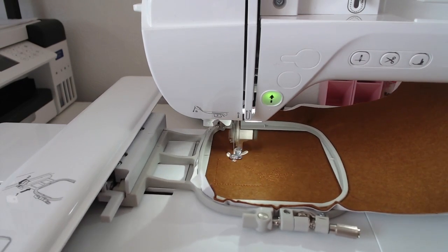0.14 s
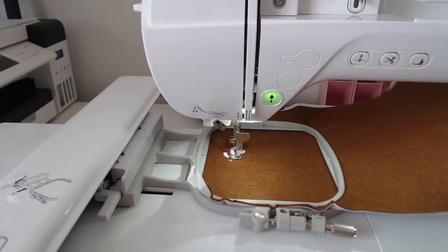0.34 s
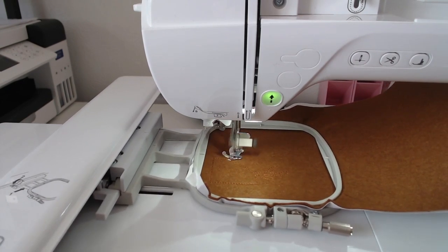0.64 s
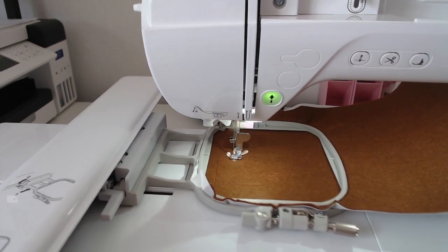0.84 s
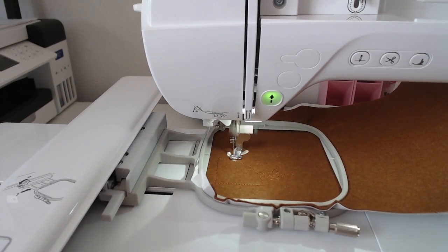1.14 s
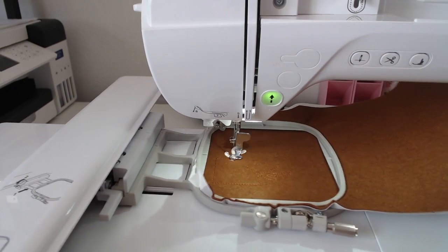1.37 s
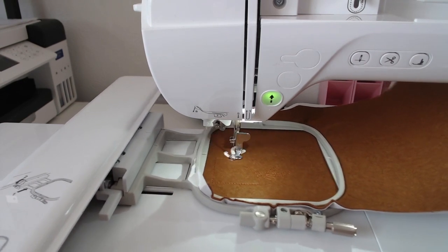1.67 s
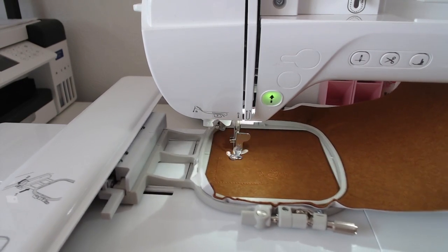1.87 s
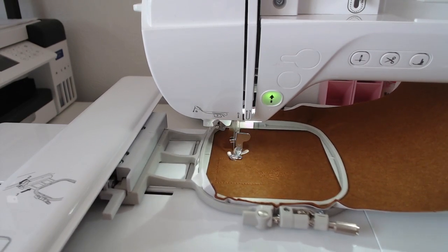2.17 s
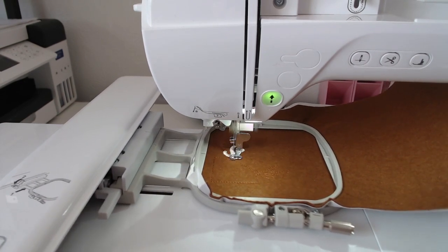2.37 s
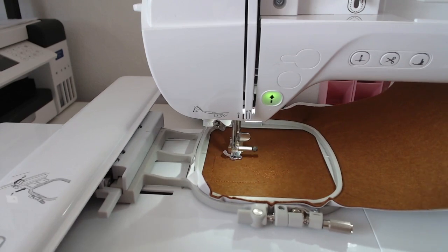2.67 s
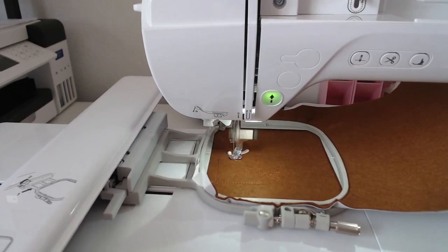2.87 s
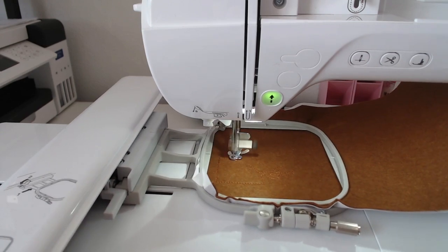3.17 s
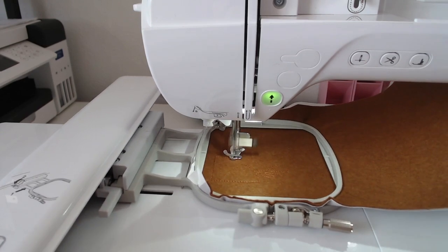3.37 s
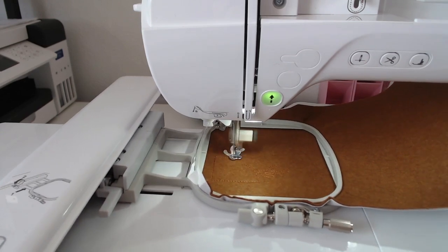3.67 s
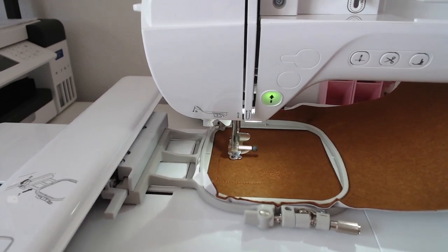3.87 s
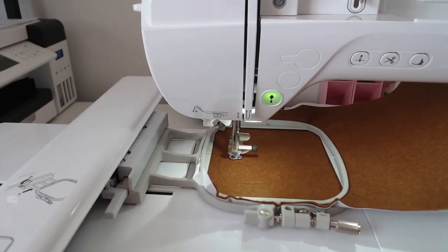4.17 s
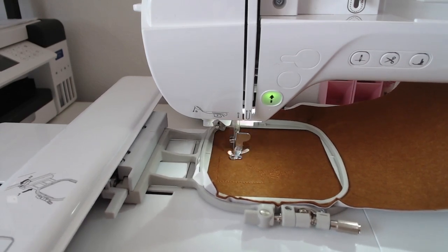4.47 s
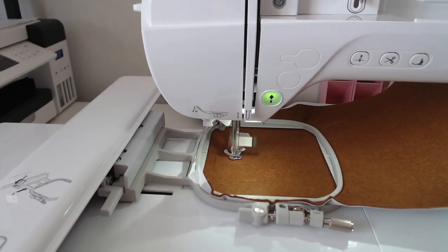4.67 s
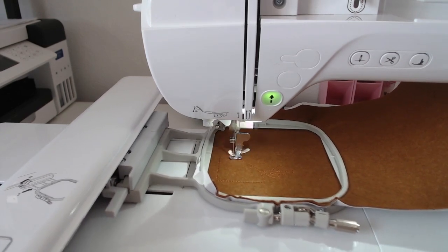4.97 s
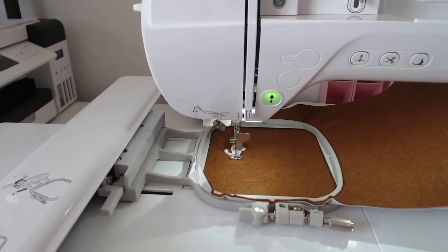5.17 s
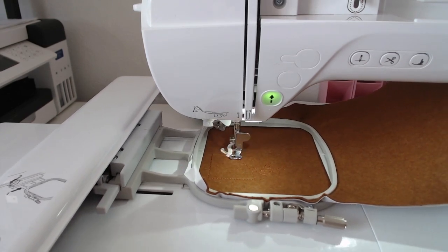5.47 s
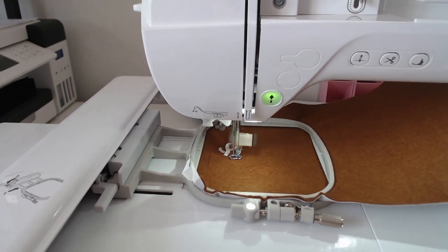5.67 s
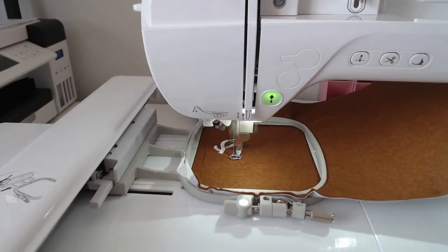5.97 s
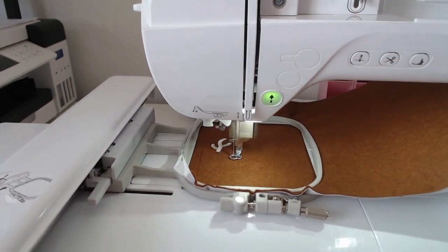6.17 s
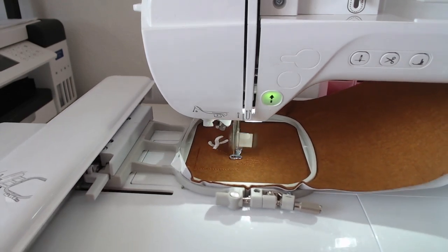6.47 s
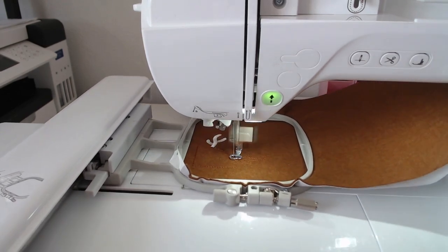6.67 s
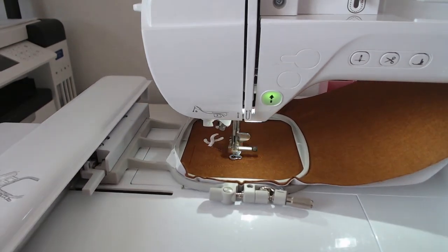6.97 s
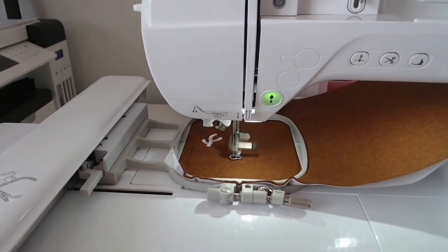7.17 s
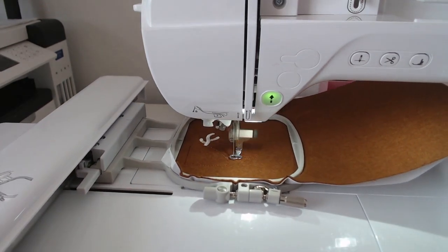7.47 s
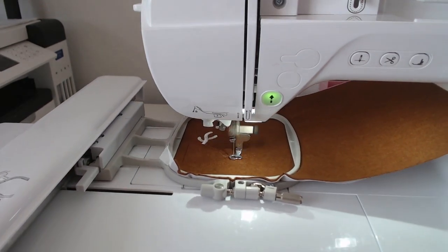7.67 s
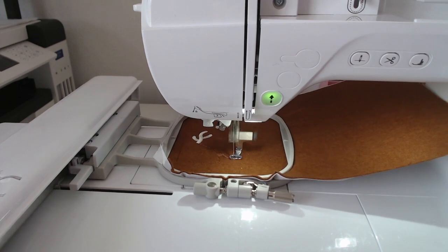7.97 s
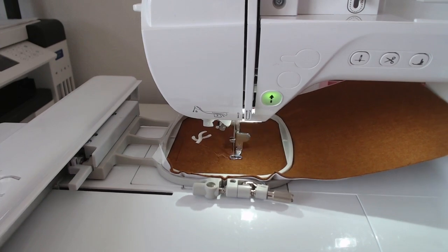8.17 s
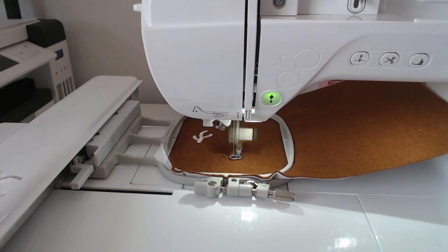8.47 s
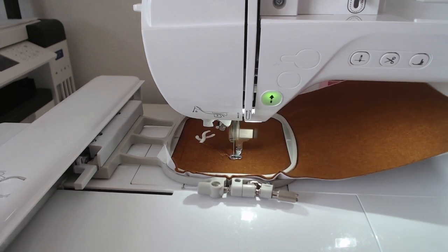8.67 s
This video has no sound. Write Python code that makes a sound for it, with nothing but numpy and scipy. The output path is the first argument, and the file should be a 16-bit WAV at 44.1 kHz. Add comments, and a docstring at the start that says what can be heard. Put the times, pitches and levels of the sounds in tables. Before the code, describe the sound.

An embroidery machine sews close by in a small room. Even needle knocks, nearly six a second, alternate with metallic ticks and the raspy jerks of motors moving the hoop. Just after five seconds the pace climbs to about ten strokes a second, a gear whine and hollow case drone swell, and it ends faster still, without stopping.

```python
"""First one hears a slow, steady knocking and rattling: an embroidery machine sews in a small room.
After five seconds it speeds up to nearly twice the pace. In every turn of the main shaft the needle knocks
down, the links tick, and stepper motors jerk the hoop along. Blows are short bursts of noise and fading
sines; rumble, rattle and drone are coloured noise. The gear whine is a tone that follows the sewing speed."""
import sys
import numpy as np
from scipy import signal
from scipy.fft import rfft, irfft, next_fast_len
from scipy.io import wavfile
from scipy.ndimage import uniform_filter1d

SR = 44100
rng = np.random.default_rng(int(sys.argv[2]) if len(sys.argv) > 2 else 0)


def digitize_waveform(pressure):
    """Quantize a signal to 16-bit integers and store it at the path in sys.argv[1].

    Rows of a 2-D input are taken as channels; values are limited to [-1, 1].
    """
    field = np.atleast_2d(pressure).T
    bounded = np.clip(field, -1, 1)
    quanta = np.round(bounded * 32767).astype(np.int16)
    wavfile.write(sys.argv[1], SR, quanta)


N = 389844
TIME = np.arange(N) / SR
PADDED = next_fast_len(N + SR // 2, True)
BINS = np.fft.rfftfreq(PADDED, 1 / SR)

# A turn starts at the needle stroke; a share of a turn runs from 0 to 1. Source levels are before room and balance.
# sewing speed: (time [s], speed [stitches/s])
SEWING_SPEED = [(0, 5.812), (4.98, 5.82), (5.2, 6.5), (5.6, 8.17), (5.78, 9), (5.93, 9.35), (5.98, 9.95),
                (6.16, 10.3), (6.32, 10), (6.74, 9.97), (6.8, 9.27), (7.1, 9.1), (7.37, 9.25), (7.48, 9.96),
                (7.82, 10), (8.14, 11.37), (8.3, 11.53), (8.84, 11.52)]
# needle strokes: (time [s], metal click [dB], woody knock [dB], low thump [dB], size of the hoop move before it [dB])
STITCH_LEVELS = [(0.1513, -49, -57, -47, 1.5), (0.322, -58, -41.5, -33.5, -3.5), (0.4965, -46, -55, -40, 1),
                 (0.6674, -61.5, -46, -45, -2.5), (0.841, -54, -53, -36, -1.5),
                 (1.0102, -63.5, -46, -41, -5), (1.1825, -51, -52, -38, -4),
                 (1.3551, -56.5, -44, -46, -0.5), (1.527, -52, -46, -45, -5.5),
                 (1.701, -50.5, -41.5, -35, -4), (1.8728, -51, -44, -37, -4.5), (2.0425, -52, -61, -46, -4),
                 (2.2162, -59, -60.5, -43, -4), (2.386, -53, -50.5, -45, -4), (2.56, -49, -41, -51, -2.5),
                 (2.7294, -49.5, -43.5, -39, -5), (2.9041, -62.5, -65, -40.5, -3),
                 (3.074, -50, -44, -45, -6.5), (3.2465, -46, -48, -45, -3), (3.42, -51, -44, -41, -3),
                 (3.5909, -49, -46.5, -61, -3), (3.762, -49, -38.5, -39, -2.5),
                 (3.9335, -46, -47.5, -42, -2.5), (4.1043, -58.5, -42, -41.5, -6),
                 (4.2771, -50, -41.5, -49, -2), (4.45, -49.5, -39, -40, -4.5),
                 (4.6215, -59.5, -51, -64, -1.5), (4.7921, -52.5, -41.5, -42.5, -2),
                 (4.96, -51.5, -54, -51, -2.5), (5.1303, -61, -49, -67, -18), (5.2831, -45, -43, -38, 0.5),
                 (5.4219, -49, -47, -43, -2), (5.5509, -46, -42.5, -43, -2), (5.671, -48.5, -52, -59, -2),
                 (5.7849, -48, -39.5, -34, -0.5), (5.894, -51.5, -52, -38, 1), (6.0006, -49, -41, -36, 0),
                 (6.1005, -48.5, -43, -44, -4.5), (6.196, -53.5, -41.5, -33, -2),
                 (6.295, -52.5, -37, -34.5, -5), (6.395, -50.5, -40, -38, -8),
                 (6.4931, -51, -44, -42.0, -4.5), (6.5975, -57.5, -39, -53, 1), (6.6964, -48, -47, -47, -3),
                 (6.797, -60.5, -49, -49, -4), (6.91, -49.5, -46.0, -63, 0.5),
                 (7.0177, -49.5, -37.5, -36, 2), (7.1314, -61, -45.5, -56, -14), (7.2369, -54, -42, -52, 0),
                 (7.346, -54, -46, -38, 0.5), (7.4495, -53.5, -45, -51, -4), (7.5508, -55, -40, -42, -7),
                 (7.652, -52.5, -37.5, -63, -4.5), (7.752, -47, -43, -67, -2.5),
                 (7.8516, -46, -40, -44, -3.5), (7.9486, -51, -47, -39, -4), (8.0419, -55, -39, -35.5, -8),
                 (8.1294, -64, -56, -46, -12), (8.2157, -56.5, -48, -40, -1.5),
                 (8.3039, -58.5, -51, -45, 0), (8.3887, -51, -62, -42, -13), (8.4751, -51.5, -52, -35, 2),
                 (8.5615, -50, -55, -44, -9.5), (8.6484, -47.5, -38, -49, 1), (8.7327, -56.5, -56, -36, 0),
                 (8.819, -54, -56, -51.0, -6)]
# ticks of the links in each turn: (share of turn [0-1], level against the mean needle click [dB])
LINK_TICKS = [(0.228, -4.5), (0.675, -5), (0.813, -3), (0.963, -11.5)]
# jerks of the hoop in each move: (share of turn [0-1], level against the shake [dB], thud pitch [Hz])
HOOP_JERKS = [(0.531, 5, 174), (0.639, 7.5, 183), (0.695, 0, 228.4), (0.743, -4, 199), (0.794, 1, 150.7),
              (.857, 8, 152)]
# swing of levels over one turn: (share of turn [0-1], stepper activity [dB], load on the bearings [dB])
TURN_LOAD = [(0, -3, 5.5), (.12, -9.5, 4.5), (.3, -14, -0.5), (.49, -29.5, 1.5), (.505, 6, 0.5), (.6, 6, 5),
             (.68, 8, 4), (.77, 7.5, 5), (.84, -0.5, 8), (.92, -5, 3), (1, 6.5, 5.5)]
# clacks of the hoop in its mount during some moves: (time [s], level before trims [dB], ring pitch [Hz])
HOOP_CLACKS = [(0.266, -44.5, 2520), (0.445, -49, 2580), (0.608, -46.5, 2880), (3.37, -47, 4000),
               (3.7084, -50, 3900), (3.8737, -48, 3240), (4.221, -45, 3170), (4.5655, -46, 2400),
               (4.604, -52, 3950), (6.581, -55, 3000), (7.297, -49.5, 3220), (7.3207, -46, 2520),
               (8.088, -46.5, 2460), (8.2645, -55, 1900), (8.2935, -49.5, 3170)]
# knocks of the hoop's plastic frame: (time [s], level [dB], pitch [Hz])
FRAME_KNOCKS = [(0.369, -32, 603), (0.615, -40, 302), (0.713, -32, 450), (1.156, -35, 800),
                (1.501, -32.5, 700), (3.778, -31, 700), (6.437, -28.5, 380), (6.63, -28, 397),
                (7.239, -45, 350), (7.852, -25.5, 353), (8.093, -32, 700), (8.269, -31.5, 1050)]
# moves that make the carriage boom: (time of the peak [s], length [s], level at the peak [dB rms], pitch [Hz])
CARRIAGE_BOOMS = [(5.249, 0.045, -39, 217), (6.79, 0.047, -34, 216.5), (8.212, 0.02, -31, 220),
                  (8.313, 0.046, -37, 219)]
# ringing of the housing, carriage, needle plate and needle bar: (pitch [Hz], relative level [dB], time to fade 60 dB [s])
HOUSING_MODES = [(44.7, -15, 0.32), (94.4, -7.5, 0.9), (121, -5.5, 0.17), (141.5, 3.5, 0.32)]
CARRIAGE_MODES = [(104, -6, 0.15), (140, 1.5, 0.19), (215, -3, 0.091)]
PLATE_MODES = [(312, -2.5, 0.15), (338, 4, 0.093), (409.7, -1.5, 0.27), (452, -3, .06), (526, -4.5, 0.082),
               (642.2, -8.5, 0.35), (849, -5, 0.086)]
NEEDLE_BAR_MODES = [(1140, 1, 0.054), (3116, -4.5, 0.078), (4410, -15.5, 0.023)]
# noise colours, later scaled to an even overall level: (frequency [Hz], relative level [dB per Hz])
CLICK_COLOUR = [(200, -6.5), (1200, 6), (1900, 3.5), (3500, 5.5), (5000, 1.5), (6300, -2.5), (7400, -16.5),
                (8600, -30)]
LINK_COLOUR = [(200, -6.5), (1200, 0.5), (1900, 0), (2600, 5), (3900, 4), (4800, -0.5), (7200, -6),
               (8600, -38.5)]
STEPPER_COLOUR = [(100, -17), (300, 2.5), (800, 11.5), (1100, 6.5), (1350, 5.5), (1800, 1.5), (2500, 4.5),
                  (3200, -9), (4100, -7.5), (7300, -16), (8600, -42.5)]
BEARING_COLOUR = [(20, -16.5), (65, -24.5), (95, -6), (130, -1), (180, -13.5), (400, -12), (470, -15.5),
                  (800, -21.5), (1800, -33.5), (8600, -66)]
CHATTER_COLOUR = [(100, -14.5), (500, -0.5), (1200, 4), (4800, -4.5), (7400, -16.5), (8600, -40.5)]
# stepper scrape as the motors speed up and brake: (share of turn [0-1], pitch [Hz])
SCRAPE_PITCH = [(.49, 2209), (.6, 2410), (.66, 3306), (.69, 4020), (.76, 3296), (.84, 2457)]
# loudness of the gear and rotor tones by pitch: (frequency [Hz], level before the swings [dB])
GEAR_RESPONSE = [(765, -53.5), (845, -54.5), (920, -65), (1070, -62.5), (1255, -62.5), (1310, -54),
                 (1400, -60.5), (1475, -49), (1520, -59)]
ROTOR_RESPONSE = [(1400, -57), (1475, -64.5), (1650, -73.5), (2900, -69)]
# slow change of the gear tone: (time [s], level change [dB])
GEAR_DRIFT = [(0, 1), (2.5, 1), (3.3, -2), (3.8, -7), (4.9, -11.5), (5.15, 1), (8.2, 4.5), (8.84, 3.5)]
# swell of the gear tone in each turn, in full only at speed: (share of turn [0-1], level change [dB])
WHINE_THROB = [(0, -4.5), (.1, -1), (.3, 1.5), (.5, 0.5), (.8, -5.5), (1, -4.5)]
# hollow drones of the case: (pitch [Hz], width [Hz], level when slow [dB], level at full speed [dB]), before the swell
CASE_DRONES = [(220.6, 24, -58, -45), (345.3, 33, -63.5, -48.5), (404.8, 24, -61.5, -47),
               (533.4, 81, -66, -52.5), (783.3, 85, -58.5, -52.5), (1042, 58, -74.5, -59)]
# hum of the energised motors: (pitch [Hz], level before flutter [dB rms])
MOTOR_HUM = [(120, -50.5), (412, -65)]
# room sound against direct sound: (frequency [Hz], level [dB])
ROOM_COLOUR = [(60, -28), (150, -28.5), (350, -23.5), (700, -5.5), (1400, -4.5), (3000, -7), (8000, -5.5)]
# left against right: (frequency [Hz], left minus right [dB])
BALANCE = [(100, .5), (400, 0), (800, 1.2), (1400, 3), (2800, 1.4), (5500, 0)]
# how alike left and right are: (frequency [Hz], correlation [-1 to 1])
LIKENESS = [(150, .99), (400, 0.92), (750, 1), (1400, 0.57), (3000, 0.33), (7000, 0.25)]

SLOW, FAST = 5.82, 11.5  # stitches per second where haste is 0 and 1
TEETH, ROTOR_ORDER = 131, 253.4  # cycles per stitch of the gear tone and the rotor tone
# stepper rattle and hoop shake for a plain move; moves below SMALL_MOVE_DB shake less and less
RATTLE_DB, SHAKE_DB, SMALL_MOVE_DB = -55, -38, -4.5
# loose parts: blows a second at full speed, energy of a blow (steady chatter = 1), fall of that energy
LOOSE_PER_S, LOOSE_ENERGY, LOOSE_DECAY_S = 55, 10 ** (18 / 20), .003
# noise beside the clean gear tone, extra noise at full speed (both as gains)
MESH_ROUGH, MESH_ROUGH_FAST = .4, .2
GRAIN_DB = 2  # unevenness of the stepper sound
EDGE_HZ = 8700  # upper band limit


def amp(db):
    """Turns decibels into a gain."""
    return 10 ** (np.asarray(db) / 20)


def unit(x):
    """Scales to rms 1."""
    return x / np.sqrt(np.mean(x ** 2) + 1e-20)


def curve(rows, at, axis=1):
    """Joins one column of a table by straight lines."""
    rows = np.asarray(rows, float)
    return np.interp(at, rows[:, 0], rows[:, axis])


def spectrum(rows, hz):
    """Gain from a dB table, joined on a log-frequency axis."""
    f, db = np.transpose(rows)
    return amp(np.interp(np.log(hz + 1), np.log(f), db))


def colour(x, rows):
    """Filters by a spectrum, without delay."""
    return irfft(rfft(x, PADDED) * spectrum(rows, BINS), PADDED)[..., :N]


def waver(hz, order=12):
    """Random wandering of rms 1, mostly below hz; drawn at every order-th sample and joined by lines."""
    size = next_fast_len(N // order + 2, True)
    smooth = np.exp(-(np.fft.rfftfreq(size, order / SR) / hz) ** 2)
    slow = irfft(rfft(rng.standard_normal(size)) * smooth, size)
    return np.interp(TIME, np.arange(size) * order / SR, unit(slow))


def murmur(angle, width_hz):
    """A narrow band of noise of rms 1 around a turning phase."""
    return waver(width_hz) * np.sin(angle) + waver(width_hz) * np.cos(angle)


def spread(rows, envelope=1):
    """Coloured stereo noise from all over the machine, as alike left and right as LIKENESS says."""
    shared, apart = (rfft(envelope * rng.standard_normal(N), PADDED) for _ in range(2))
    alike = np.clip(curve(LIKENESS, BINS), -1, 1)
    mid = shared * np.sqrt((1 + alike) / 2)
    side = apart * np.sqrt((1 - alike) / 2)
    return irfft(np.array([mid + side, mid - side]) * unit(spectrum(rows, BINS)), PADDED)[:, :N]


def strike(times, db, response):
    """Blows at the given times, each setting off the response."""
    out = np.zeros(N)
    for at, gain in zip(np.round(times * SR).astype(int), amp(db)):
        if 0 <= at < N:
            out[at:at + len(response)] += gain * response[:N - at]
    return out


def ring(times, db, modes, uneven_db, window):
    """Blows into ringing modes, each in a slightly different mix; db is the nominal rms over window seconds."""
    t = np.arange(SR // 3) / SR
    rings = []
    for k, (hz, level, t60) in enumerate(modes):
        rings.append((-1) ** k * amp(level - 60 * t / t60) * np.sin(2 * np.pi * hz * t))
    size = np.sqrt(np.sum(np.sum(rings, 0) ** 2) / (window * SR))
    return sum(strike(times, db + uneven_db * rng.standard_normal(len(times)), r) for r in rings) / size


def tap(hz, rise):
    """A well-damped swing whose outline peaks at 1 after rise seconds."""
    t = np.arange(SR // 16) / SR
    return (t / rise * np.exp(1 - t / rise)) ** 2 * np.sin(2 * np.pi * hz * t)


def needle_times():
    """The moments at which the shaft completes a turn, with one turn more at each end."""
    s = np.array(STITCH_LEVELS)[:, 0]
    return np.r_[2 * s[0] - s[1], s, 2 * s[-1] - s[-2]]


def each_turn(share):
    """The moment at which the shaft passes an angle, in the turn that leads to each stitch."""
    s = needle_times()
    return (s[:-1] + share * np.diff(s))[:-1]


def haste_at(t):
    """About 0 when sewing slowly, about 1 at full speed."""
    return np.log(curve(SEWING_SPEED, t) / SLOW) / np.log(FAST / SLOW)


def stitches(shake_haste_db=-3.5):
    """Levels of every stitch in dB: needle click, plate knock, housing thump, stepper rattle, hoop shake."""
    s, click, knock, thump, move = np.transpose(STITCH_LEVELS)
    small_move_loss = 10 * np.log10(1 + amp(SMALL_MOVE_DB - move) ** 2)
    shake = SHAKE_DB + shake_haste_db * haste_at(s) - small_move_loss
    return click, knock, thump, RATTLE_DB + move, shake


def room(x, t60=0.17):
    """Adds a short room tail of fading noise, different at each microphone."""
    t = np.arange(SR // 3) / SR
    tails = rng.standard_normal((2, len(t))) * amp(-60 * t / t60)
    tails /= np.linalg.norm(tails, axis=1, keepdims=True)
    return x + colour(signal.fftconvolve(x, tails, axes=1)[:, :N], ROOM_COLOUR)


def hum(flutter=0.52, wander=0.84):
    """The energised motors hum throughout, at fixed pitches with a wavering level and phase (wander in radians)."""
    out = np.zeros(N)
    for hz, db in MOTOR_HUM:
        tone = np.sin(2 * np.pi * hz * TIME + wander * waver(5))
        out += np.sqrt(2) * amp(db) * (1 + flutter * waver(6)) * tone
    return out


def case(turn, haste, swell_db=8.0, swell_turns=0.11):
    """The plastic case drones at its resonances, most at speed and just after the needle stroke."""
    load_db = swell_db * uniform_filter1d(np.exp(-turn / swell_turns), SR // 200)
    out = np.zeros(N)
    for hz, width, slow_db, fast_db in CASE_DRONES:
        level = slow_db + (fast_db - slow_db) * haste + load_db
        out += murmur(2 * np.pi * hz * TIME, width) * amp(level)
    return out


def bearings(turn, haste, db=-50, haste_db=8, flutter_db=2.5, chatter_db=-68.0, chatter_haste_db=11.0):
    """Shaft and hook rumble with the load of the stroke; at speed loose parts chatter in separate little blows."""
    load_db = curve(TURN_LOAD, turn, axis=2) + flutter_db * waver(55)
    rumble = spread(BEARING_COLOUR) * amp(db + haste_db * haste + load_db)
    hits = rng.random(N) < LOOSE_PER_S * haste / SR
    blows = signal.lfilter([1], [1, -np.exp(-1 / (LOOSE_DECAY_S * SR))], hits)
    chatter = spread(CHATTER_COLOUR, unit(np.sqrt(1 + LOOSE_ENERGY * blows)))
    return rumble + chatter * amp(chatter_db + chatter_haste_db * haste + load_db)


def whine(turn, speed, haste, wobble=0.0065, slow_depth=0.017, port_lag=0.53):
    """Gear and rotor tones ride on the shaft speed and swell at case resonances; the gears throb each stitch."""
    angle = 2 * np.pi * np.cumsum(speed * (1 + wobble * waver(24.5))) / SR
    throb_db = curve(WHINE_THROB, turn) * (slow_depth + haste)
    teeth = TEETH * angle - np.array([[0], [port_lag]])  # radians; reaches the right microphone a little later
    mesh = np.sin(teeth) + (MESH_ROUGH + MESH_ROUGH_FAST * haste) * murmur(teeth, 70)
    mesh = mesh * spectrum(GEAR_RESPONSE, TEETH * speed) * amp(throb_db + curve(GEAR_DRIFT, TIME))
    rotor_level = spectrum(ROTOR_RESPONSE, ROTOR_ORDER * speed) * (1 + .5 * waver(73))
    rotor = rotor_level * np.sin(ROTOR_ORDER * angle + waver(57))
    return np.sqrt(2) * (mesh + rotor)


def booms():
    """The carriage swells and fades at its resonance."""
    out = np.zeros(N)
    for at, length, db, hz in CARRIAGE_BOOMS:
        swell = np.exp(-2 * ((TIME - at) / length) ** 2)
        out += np.sqrt(2) * amp(db) * swell * np.sin(2 * np.pi * hz * (TIME - at))
    return out


def frame(cycles=0.73, overtone=1.5, overtone_db=-6):
    """The plastic frame knocks hollowly; the lower the pitch, the longer the knock."""
    out = np.zeros(N)
    for at, db, hz in FRAME_KNOCKS:
        upper = amp(overtone_db) * tap(overtone * hz, cycles / hz / overtone)
        out += strike(np.array([at]), [db], tap(hz, cycles / hz) + upper)
    return out


def steppers(db, turn, haste, scrape_db=-9, scrape_haste_db=-6, scrape_width_hz=420, stray=0.064,
             step_count=40, step_decay=1.0):
    """The stepper motors rattle through each move, with a scrape that follows their pace and is weaker at speed."""
    level = np.interp(TIME, each_turn(0.76), db) + curve(TURN_LOAD, turn)
    steps = np.exp(-(step_count * turn % 1) / step_decay)  # decay in steps
    rattle = spread(STEPPER_COLOUR, unit(steps))
    angle = 2 * np.pi * np.cumsum(curve(SCRAPE_PITCH, turn) * (1 + stray * waver(30.09))) / SR
    scrape = np.array([murmur(angle, scrape_width_hz) for _ in range(2)])
    return amp(level + GRAIN_DB * waver(220)) * (rattle + amp(scrape_db + scrape_haste_db * haste) * scrape)


def hoop(shake, rise=0.0027, slop=0.00086, lag_share=0.0812, carriage_db=-13):
    """Each jerk is a short thud that leaves the carriage ringing; at speed jerks come later and less regularly."""
    s = needle_times()[1:-1]
    pace, out = haste_at(s), np.zeros(N)
    for share, db, hz in HOOP_JERKS:
        lag = lag_share * pace ** 2 / curve(SEWING_SPEED, s)
        times = each_turn(share) + lag + slop * pace * rng.standard_normal(len(s))
        out += strike(times, shake + db + rng.standard_normal(len(s)), tap(hz, rise))
        out += ring(times, shake + db + carriage_db, CARRIAGE_MODES, uneven_db=3.5, window=0.017)
    return out


def clicks(db, click_db=8, snap_s=0.0022, tick_db=1, clack_db=-1, tick_decay=0.015, clack_decay=0.0088,
           ring_db=-1, ring_decay=0.0041, tick_spread_db=2, slop=0.0015, tick_haste_db=-1):
    """Metal meets metal in noise bursts: the needle bar snaps and rattles, links tick, the hoop mount clacks."""
    s = needle_times()[1:-1]
    t = np.arange(SR // 10) / SR
    # the outlines here are energies, which add, hence twice the dB
    needle = strike(s, 2 * (db + click_db), np.exp(-(t / snap_s) ** 2))
    when, clack_level, _ = np.transpose(HOOP_CLACKS)
    links = strike(when, 2 * (clack_level + clack_db), np.exp(-2 * t / clack_decay))
    links += strike(s, 2 * (db + ring_db), np.exp(-2 * t / ring_decay))
    for share, link_db in LINK_TICKS:
        late, loud = rng.standard_normal((len(s), 2)).T
        level = db.mean() + link_db + tick_db + tick_haste_db * haste_at(s) + tick_spread_db * loud
        links += strike(each_turn(share) + slop * late, 2 * level, np.exp(-2 * t / tick_decay))
    return spread(CLICK_COLOUR, np.sqrt(abs(needle))) + spread(LINK_COLOUR, np.sqrt(abs(links)))


def metal(click_db, needle_db=3, detune=0.033, clack_db=4, clack_t60=0.041):
    """The needle bar rings briefly at a pitch that varies by chance; each clack of the hoop rings at its own."""
    t, out = np.arange(SR // 16) / SR, np.zeros(N)
    rings = [(at, db + clack_db, hz, clack_t60) for at, db, hz in HOOP_CLACKS]
    for at, db in zip(needle_times()[1:-1], click_db):
        for hz, mode_db, t60 in NEEDLE_BAR_MODES:
            loud, sharp = rng.standard_normal(2)
            rings.append((at, db + needle_db + mode_db + 2 * loud, hz * np.exp(detune * sharp), t60))
    for at, db, hz, t60 in rings:
        part = out[round(at * SR):][:len(t)]
        part += (amp(db - 60 * t / t60) * np.sin(2 * np.pi * hz * t))[:len(part)]
    return out


def knocks(knock_db, thump_db, lead=0.002, push_db=5.5, push_hz=140, push_rise=0.0056, housing_db=-7,
           lever_share=.272, lever_db=-42.5, lever_hz=400, lever_rise=0.00089):
    """The needle stroke knocks the plate and shoves the ringing housing; about a quarter turn on, the lever knocks."""
    s = needle_times()[1:-1] - lead
    plate = ring(s, knock_db, PLATE_MODES, uneven_db=2.5, window=0.017)
    thump = strike(s, thump_db + push_db, tap(push_hz, push_rise))
    thump += ring(s, thump_db + housing_db, HOUSING_MODES, uneven_db=0.5, window=0.059)
    lever_level = lever_db + 2 * rng.standard_normal(len(s))
    thread_lever = strike(each_turn(lever_share), lever_level, tap(lever_hz, lever_rise))
    return plate + thump + thread_lever


def scene():
    """Shaft and stitches drive most sounds; booms, clacks and frame knocks have listed times, hum runs throughout."""
    s = needle_times()
    turn = np.interp(TIME, s, np.arange(len(s))) % 1
    speed, haste = curve(SEWING_SPEED, TIME), haste_at(TIME)
    click, knock, thump, rattle, shake = stitches()
    # rumble and drone sink when the hoop shakes less
    stirred = amp(0.5 * np.interp(TIME, s[1:-1], shake - np.median(shake)))
    drive = stirred * (bearings(turn, haste) + case(turn, haste))
    hoop_moves = booms() + frame() + steppers(rattle, turn, haste) + hoop(shake)
    needle = clicks(click) + np.array([metal(click), metal(click)]) + knocks(knock, thump)
    sound = room(drive + hoop_moves + needle) + whine(turn, speed, haste) + hum()
    ears = []
    for ear, side in zip(sound, (1, -1)):  # left, right
        ears.append(colour(ear, [(hz, side * db / 2) for hz, db in BALANCE]))
    return np.array(ears)


def record(dry):
    """Takes away the treble above the band limit with a steep low-pass filter."""
    low_pass = signal.firwin(511, EDGE_HZ, window=("kaiser", 9), fs=SR)
    return signal.oaconvolve(dry, low_pass[None], "same")


dry = scene()
out = record(dry)
digitize_waveform(out)
```